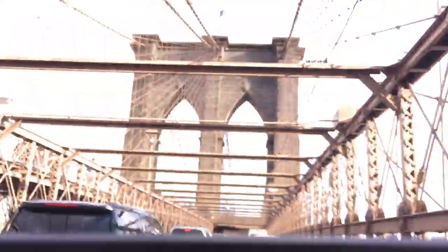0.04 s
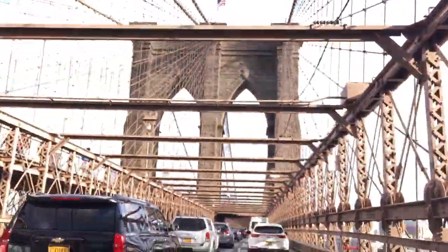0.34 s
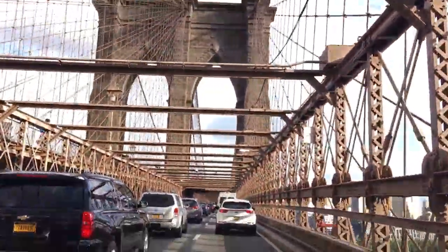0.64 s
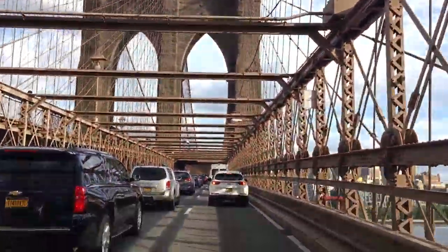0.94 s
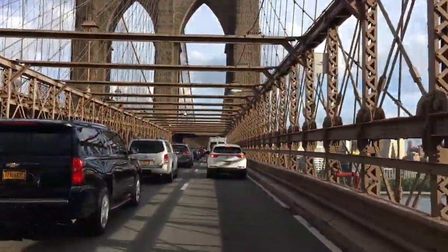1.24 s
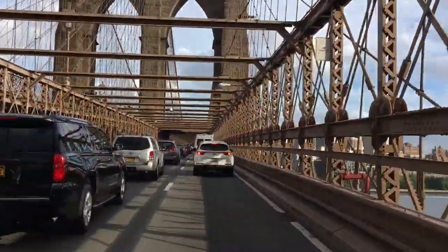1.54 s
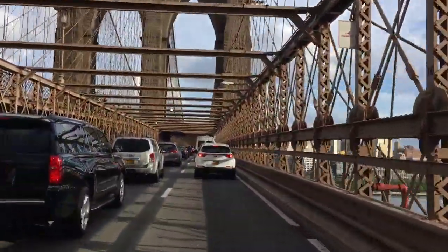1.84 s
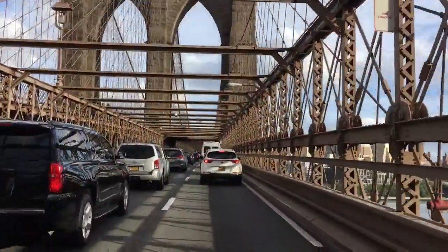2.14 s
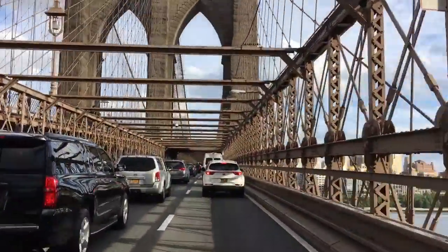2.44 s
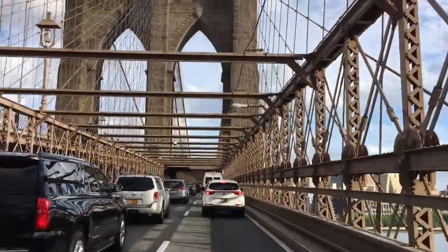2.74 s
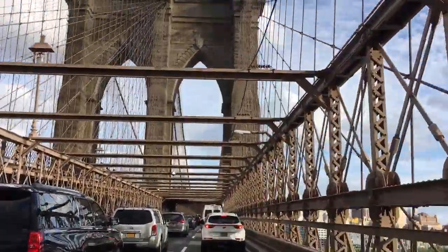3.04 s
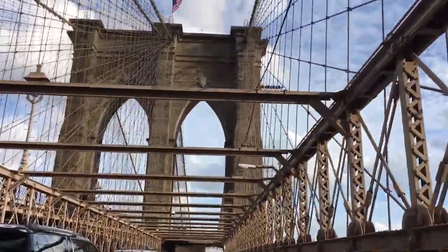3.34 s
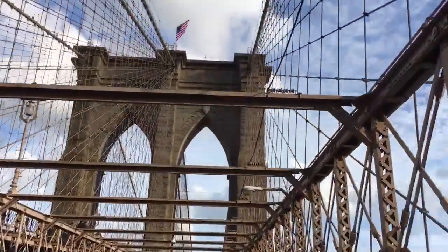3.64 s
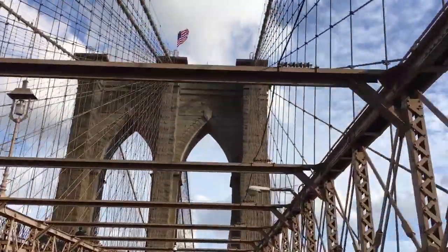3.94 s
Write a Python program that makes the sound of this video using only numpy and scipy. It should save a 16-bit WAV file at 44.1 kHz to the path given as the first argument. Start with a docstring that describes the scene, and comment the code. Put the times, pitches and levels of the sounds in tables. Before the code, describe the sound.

Wind buffets a microphone outside a car crossing a bridge, over steady tyre and traffic rush and a low engine drone. At about 0.6 seconds a strong gust thumps, with faint dry ticks, and the level briefly dips. Fluttering and small thumps continue, with short hollow blowing tones around 1 to 1.5 seconds. The wind eases near 3 seconds, then one low bump comes at 3.9.

```python
"""A steady rush of tyres and traffic over a low engine drone, from a car rolling slowly over a bridge.
The microphone is out in the airstream: wind buffets and flutters on it, single eddies thump it,
and air grazing its port blows a hollow note. A few faint dry ticks sound through.
Early on, one strong gust overloads the recorder, whose gain control ducks and slowly recovers."""
import sys
import numpy as np
from scipy import signal
from scipy.fft import rfft, irfft
from scipy.io import wavfile
from scipy.ndimage import uniform_filter1d, minimum_filter1d

SR = 44100
rng = np.random.default_rng(int(sys.argv[2]) if len(sys.argv) > 2 else 0)


def to_wav(sig):
    """Store sig (one row per channel, or 1-D mono) as 16-bit WAV at the path in sys.argv[1].

    Samples outside -1..1 are clipped; the rate is SR.
    """
    pcm = np.clip(np.atleast_2d(sig), -1, 1) * 32767
    pcm = np.round(pcm).astype(np.int16)
    wavfile.write(sys.argv[1], SR, pcm.T)  # frames by channels


N = 176400
TIME_S = np.arange(N) / SR


def from_db(db):
    """Decibels to gain."""
    return 10 ** (np.asarray(db) / 20)


def unit_rms(x):
    """Scale to unit rms."""
    return x / np.sqrt(np.mean(x ** 2) + 1e-20)


def in_time(rows):
    """Each column after the time column, interpolated at every sample."""
    times, *columns = np.transpose(rows)
    return [np.interp(TIME_S, times, column) for column in columns]


def shaped_noise(gain_at):
    """Noise of unit rms whose spectrum follows a function of frequency."""
    hz = np.maximum(np.arange(N // 2 + 1) * SR / N, 1)
    return unit_rms(irfft(rfft(rng.standard_normal(N)) * gain_at(hz), N))


def coloured(spectrum, subsonic_hz=18):
    """Noise of unit rms with a tabled spectrum and no subsonic part."""
    freqs, db = np.transpose(spectrum)
    return shaped_noise(lambda hz: from_db(np.interp(np.log(hz), np.log(freqs), db)) * (hz > subsonic_hz))


def drift(rate_hz):
    """Random swings of spread 1, mostly near the given rate."""
    return shaped_noise(lambda hz: (hz / rate_hz) / (1 + (hz / rate_hz) ** 2) ** 2)


def evened(x, span_s):
    """Hold the level steady over the span, leaving the faster grain."""
    return x / np.sqrt(uniform_filter1d(x ** 2, int(span_s * SR)) + 1e-6)


def swell(age_s, rise_s):
    """Envelope that rises to 1 and dies away."""
    age = np.clip(age_s / rise_s, 0, 50)
    return age * np.exp(1 - age)


def turbulence(colour, swing_db, swing_hz):
    """Lumpy pressure noise: eddies swell and fade at random."""
    steady = evened(coloured(colour), span_s=.06)
    return unit_rms(steady * from_db(swing_db * drift(swing_hz)))


# Tyres and traffic on the bridge, heard from the car: (time [s], level [dB])
ROAD = [(0,-28.5),(.5,-28.5),(1.2,-28),(2.2,-28),(3.3,-28.5),(4,-27)]
# Their spectrum at the microphone: (frequency [Hz], relative level [dB])
ROAD_COLOUR = [(30, -1), (80, 6.5), (250, 3), (450, -7), (650, 2.5), (800, -1), (1050, -1), (1600, -6.5),
               (2300, -11), (2900, -16.5), (3600, -17.5), (4900, -25.5), (5700, -25), (7500, -30.5),
               (9200, -31), (10400, -37), (11800, -37), (14500, -42), (17000, -47)]
def road(whistle_hz=6285, whistle_half_width_hz=60, whistle_db=-60):
    """Steady rush of tyres and traffic, with a faint thin whistle."""
    rush = from_db(in_time(ROAD)[0]) * coloured(ROAD_COLOUR)
    whistle = shaped_noise(lambda hz: 1 / (1 + ((hz - whistle_hz) / whistle_half_width_hz) ** 2))
    return rush + from_db(whistle_db) * whistle


# Engine drone under the traffic: (time [s], firing rate [Hz], level [dB])
ENGINE = [(0, 29.3, -22.5), (0.15, 27.8, -28.5), (0.3, 27.28, -23.5), (0.44, 25.21, -20.5),
          (0.6, 27.2, -33.5), (2, 28.44, -33.5), (4, 27.78, -34)]
# Its orders at the microphone: (multiple of the firing rate, relative level [dB])
ENGINE_ORDERS = [(2, 1), (3, 1.5), (4, -13.5), (6, -24)]
def engine(wobble=0.024):
    """Low engine orders ride on a slightly unsteady speed."""
    firing_hz, db = in_time(ENGINE)
    unsteady_hz = firing_hz * (1 + wobble * drift(rate_hz=1.95))
    phase = 2 * np.pi * np.cumsum(unsteady_hz) / SR
    drone = sum(from_db(order_db) * np.sqrt(2) * np.sin(round(order) * phase + rng.uniform(0, 2 * np.pi))
                for order, order_db in ENGINE_ORDERS)
    return from_db(db) * drone


# Faint ticks behind the wind: (time [s], level [dB])
TICKS = [(.472,-15),(.673,-6),(3.623,-17)]
# Their spectrum at the microphone: (frequency [Hz], relative level [dB])
TICK_COLOUR = [(300,16),(600,18),(1200,2),(2000,-6.5),(2700,-7.5),(3800,-43),(12000,-69)]
def ticks(rise_s=0.0015):
    """Small dry clicks a few milliseconds long."""
    envelope = sum(from_db(db) * swell(TIME_S - start_s, rise_s) for start_s, db in TICKS)
    return envelope * coloured(TICK_COLOUR)


# Gusts right across the microphone port: (time [s], half length [s], level [dB], pitch [Hz])
HOLLOW_GUSTS = [(1.042,0.036,-20.5,630),(1.119,0.021,-15,567),(1.338,0.067,-25.5,580),(1.63,.059,-35,510),(2.494,0.0074,-18,540)]
def hollow_gusts(q=4.2):
    """Air grazing the port swells into a hollow resonant band and fades."""
    out = np.zeros(N)
    for peak_s, half_s, db, pitch_hz in HOLLOW_GUSTS:
        band = shaped_noise(lambda hz: 1 / (1 + q ** 2 * (hz / pitch_hz - pitch_hz / hz) ** 2))
        envelope = np.exp(-((TIME_S - peak_s) / half_s) ** 2 / 2)
        out += from_db(db) * envelope * evened(band, span_s=0.089)
    return out


# Bass of the wind, out in the airstream beside the car: (time [s], relative level [dB])
BUFFET = [(0,-23),(.38,-29),(.5,-16),(.61,-4.5),(.71,-15),(.86,-19),(.94,-27),(1.28,-19),(1.6,-19.5),(1.82,-21.5),(1.93,-17.5),(2.1,-25.5),(2.33,-18),(2.75,-21.5),(2.95,-23),(3.25,-21),(3.6,-26.5),(3.89,-24.5),(3.935,-10),(4,-24)]
# Its spectrum on the microphone: (frequency [Hz], relative level [dB])
BUFFET_COLOUR = [(20, -47), (28, -17), (39, -15), (55, 0.5), (85, 0.5), (150, -2.5), (220, -7), (330, -26),
                 (600, -62), (1500, -63), (6000, -110)]
def buffet(gain_db=-1):
    """Large slow eddies press on the microphone with a deep rumble."""
    level = from_db(in_time(BUFFET)[0] + gain_db)
    return level * turbulence(BUFFET_COLOUR, swing_db=2.5, swing_hz=28)


# Low mids of the wind, right on the microphone: (time [s], relative level [dB])
FLUTTER = [(0,-36),(.45,-31),(.535,-13.5),(.62,-8.5),(.72,-24),(.78,-22.5),(.86,-12),(.95,-19.5),(1.07,-16.5),(1.19,-19.5),(1.29,-14),(1.54,-24),(1.61,-17.5),(1.83,-27.5),(1.89,-15),(2.0,-23),(2.09,-41),(2.25,-17),(2.33,-21),(2.45,-16),(2.64,-30),(2.73,-21),(2.88,-36.5),(3.05,-25.5),(3.14,-47),(3.6,-36.5),(3.8,-26),(4,-37)]
# Spectrum of that rushing air: (frequency [Hz], relative level [dB])
FLUTTER_COLOUR = [(100, -7.5), (200, -1), (280, -0.5), (480, -2.5), (680, -8), (820, -12.5), (1050, -18),
                  (1600, -27), (3000, -50), (6000, -68), (12000, -100)]
def flutter(gain_db=-0.5):
    """Turbulent air rushes over the microphone with a fast flutter."""
    level = from_db(in_time(FLUTTER)[0] + gain_db)
    return level * turbulence(FLUTTER_COLOUR, swing_db=3.5, swing_hz=85)


# Single eddies hitting the microphone point-blank, hardest in the gust near 0.6 s:
# (time [s], relative level [dB], pitch [Hz], rise [s])
PUFFS = [(.471,-4,129,0.0055),(.508,-1,128,0.0055),(0.525,-1,203,0.0042),(0.547,2,134,0.0042),(.561,6.5,278,0.0058),(.594,13.5,300,0.0036),(0.611,11.5,155.6,0.0056),
         (0.659,3.5,260,0.0076),(.743,5,286,0.0032),(0.849,5,85,0.0046),(1.06,-4,590,0.0041),(1.261,-0.5,264,0.0064),(1.298,1,346,0.0036),(1.351,-9,448,0.0063),
         (1.401,-3,206,0.0048),(1.462,-6,252,0.0084),(1.511,-7,76,0.014),(1.601,-6.5,520,0.0057),(1.651,-4.5,137,0.0054),(1.759,-4.5,212,0.0027),
         (1.871,-2.5,216,0.0068),(1.886,-8,512,0.0034),(1.929,-2,191,0.0077),(1.954,-1,322,0.0039),(1.997,-2,291,0.0039),(2.16,-5,194,0.004),
         (2.213,-0.5,324,0.0052),(2.232,-5,570,0.0029),(2.373,-6,380,0.0036),(2.418,-4,483,0.011),(2.447,-4,481,0.0027),(2.478,-2.5,304,0.0041),
         (2.545,-6.5,221,0.0052),(2.594,-3,344,0.0063),(2.68,-0.5,128,0.0039),(2.715,-4.5,231,0.009),(2.753,-1.5,250,.006),(2.795,-3.5,84,0.0066),
         (2.892,-5,198,0.0044),(2.94,-8,163,0.0044),(2.982,-7.5,536,0.004),(3.045,-4,276,0.0067),(3.149,-2,152,0.0044),(3.257,-6.5,99,0.006),
         (3.355,-4,202,0.0032),(3.436,-10,70,0.012),(3.532,-5.5,77,0.0061),(3.722,-6.5,137,0.0052),(3.917,1,99.4,0.011),(3.928,-3,254,0.0027)]
def puffs(thump_db=-10.5, air_db=-10, kick_db=-12.5, kick_pitch_ratio=1.8, port_low_cut_hz=49):
    """Each eddy is a short pressure kick and a wavering thump of a few cycles, wrapped in rushing air."""
    out = np.zeros(N)
    wander_rad_per_hz = 0.0023 * drift(rate_hz=71)
    air = from_db(air_db) * coloured(FLUTTER_COLOUR)
    for start_s, db, pitch_hz, rise_s in PUFFS:
        span = (TIME_S > start_s) & (TIME_S < start_s + .1)
        age_s = TIME_S[span] - start_s
        phase = 2 * np.pi * (pitch_hz * age_s + rng.random())
        tone = np.sqrt(2) * np.sin(phase + pitch_hz * wander_rad_per_hz[span])
        thump = from_db(thump_db) * swell(age_s, rise_s) * (tone + air[span])
        # the pressure step at the front of the eddy rings for about a cycle
        kick = from_db(kick_db) * swell(age_s, rise_s=.001) * np.sin(kick_pitch_ratio * phase)
        out[span] += from_db(db) * (thump + kick)
    low_cut = signal.butter(3, port_low_cut_hz, "high", fs=SR, output="sos")
    return signal.sosfilt(low_cut, out)


def scene():
    """Close wind and the traffic behind it meet at one microphone."""
    wind = flutter() + buffet() + puffs() + hollow_gusts()
    return (wind + ticks() + road() + engine())[None]


def gain_control(x, threshold_db=-9.5, sense_s=0.042, attack_s=0.075, recover_s=0.44):
    """The recorder turns down quickly above a threshold, then eases back up, fast at first."""
    power = uniform_filter1d(x ** 2, int(sense_s * SR))
    over_db = np.maximum(10 * np.log10(np.maximum(power, 1e-9)) - threshold_db, 0)
    release = np.exp(-TIME_S / recover_s)
    held_db = np.maximum.accumulate(over_db / release, axis=-1) * release
    pole = np.exp(-1 / (attack_s * SR))
    duck_db = signal.lfilter([1 - pole], [1, -pole], held_db)
    return x * from_db(-duck_db)


def limiter(x, ceiling=1.0, span_s=.003):
    """A fast gain dip holds each overloading peak under the ceiling."""
    size = int(span_s * SR)
    gain = minimum_filter1d(ceiling / np.maximum(np.abs(x), ceiling), size)
    return x * uniform_filter1d(uniform_filter1d(gain, size // 2), size // 2)


def record(dry, fade_s=.003, cutoff_hz=17150):
    """Gain control, peak limiter and a steep cut of the top; a short fade keeps the ends from clicking."""
    fade = np.minimum(np.minimum(TIME_S, TIME_S[::-1]) / fade_s, 1)
    high_cut = signal.ellip(12, .1, 90, cutoff_hz, fs=SR, output="sos")
    return signal.sosfilt(high_cut, limiter(gain_control(dry)) * fade)


dry = scene()
out = record(dry)
to_wav(out)
```